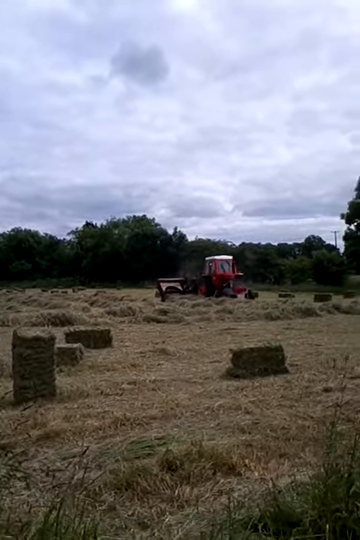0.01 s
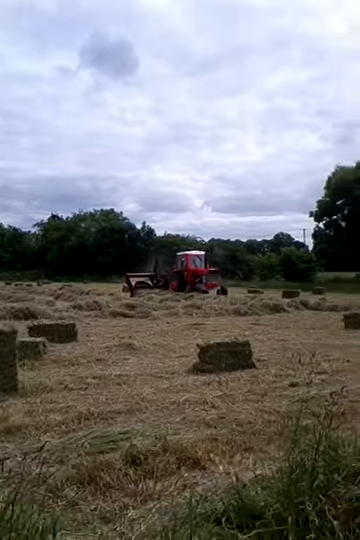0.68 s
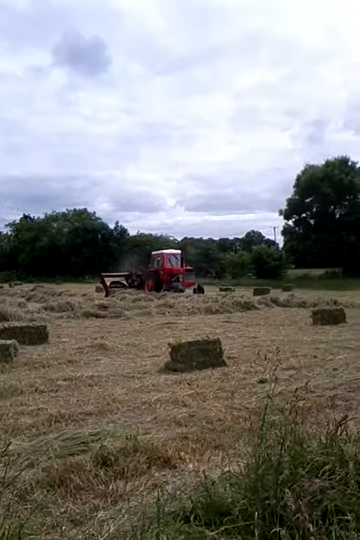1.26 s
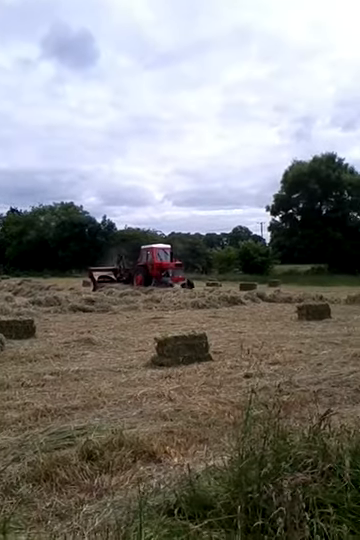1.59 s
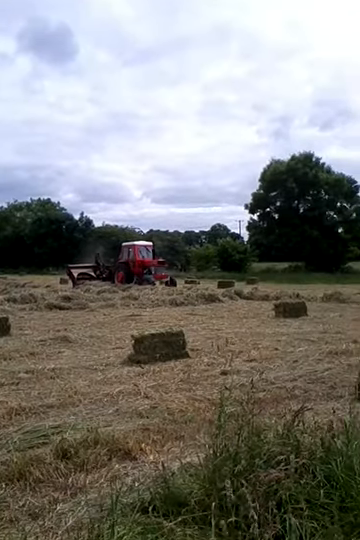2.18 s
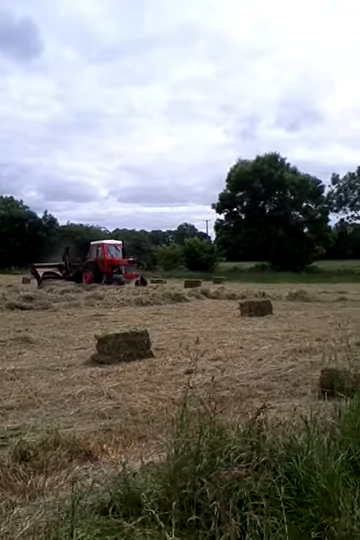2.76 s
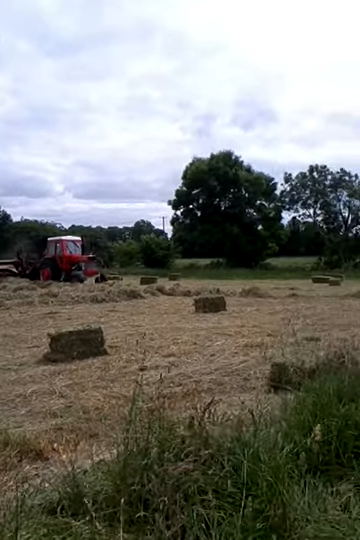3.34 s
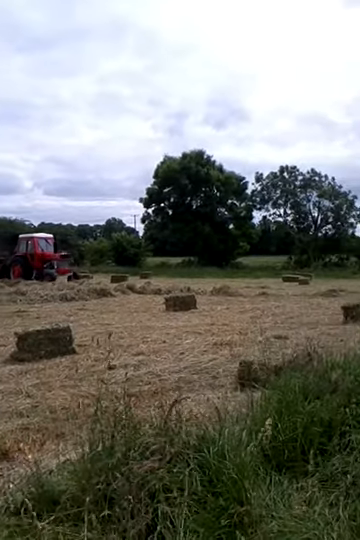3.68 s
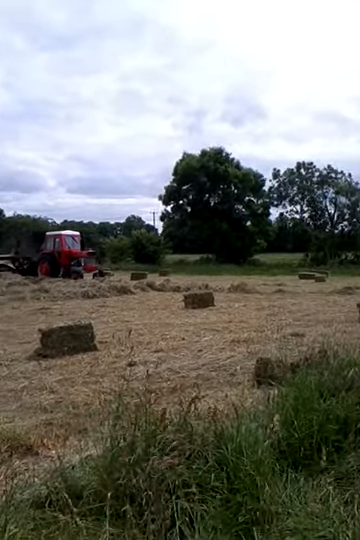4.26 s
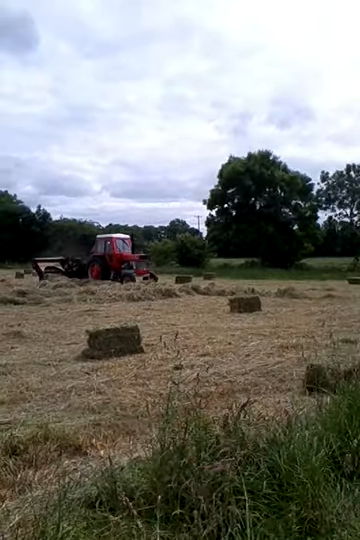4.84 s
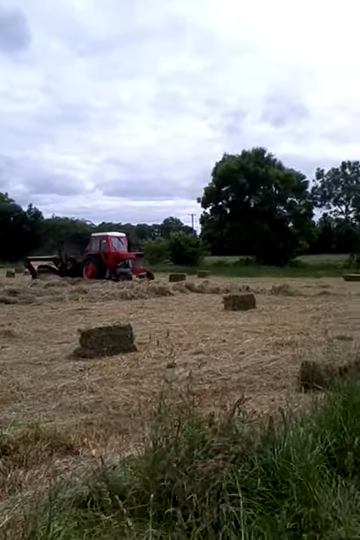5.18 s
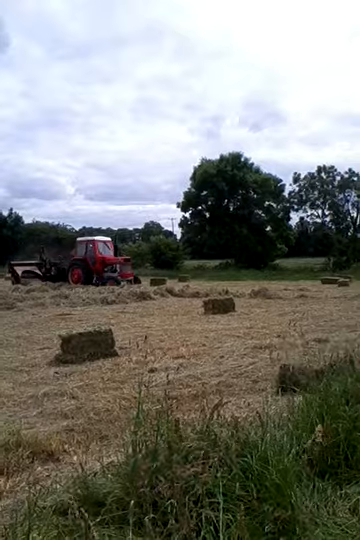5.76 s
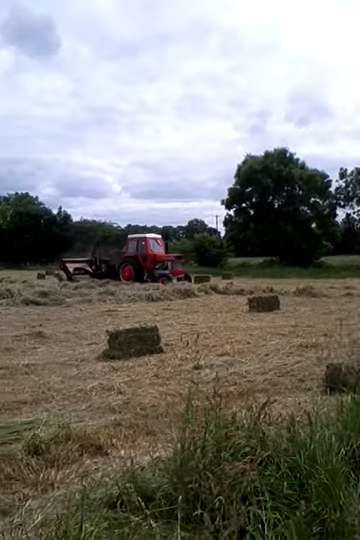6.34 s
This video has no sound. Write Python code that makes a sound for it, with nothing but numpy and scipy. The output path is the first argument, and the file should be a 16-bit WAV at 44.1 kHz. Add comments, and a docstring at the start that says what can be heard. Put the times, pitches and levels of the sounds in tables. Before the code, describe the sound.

A diesel tractor tows a baler some way off in an open field, its engine droning and clattering steadily over a faint hiss of hay. The baler chafes about once a second. After a second or so, sharp knocks and dull bumps sound right on the hand-held microphone, much louder than the machine, followed by finger rubbing and small squeaks. The tractor then carries on with occasional light metallic clinks and clacks.

```python
"""A hayfield, where a three-cylinder diesel tractor tows a baler some way off. Periodic firing drives
the exhaust drone and the engine's clatter, in which a blurred tone wavers; the pick-up rushes through
the hay, the plunger chafes about once a second, and metal parts clink and clack. Close by, as the grip
shifts on a hand-held casing, sharp knocks and dull bumps excite its hollow modes, and the fingers rub
lightly over it."""
import sys
import numpy as np
from scipy import signal
from scipy.fft import rfft, irfft
from scipy.io import wavfile
from scipy.ndimage import uniform_filter1d, map_coordinates

SR = 44100
rng = np.random.default_rng(int(sys.argv[2]) if len(sys.argv) > 2 else 0)


def unload_wav(signal):
    """Save mono or channel-first audio to the path in sys.argv[1] as 16-bit WAV at rate SR, clipped to [-1, 1]."""
    wavfile.write(
        sys.argv[1],
        SR,
        np.round(np.clip(np.atleast_2d(signal).T, -1, 1) * 32767).astype(np.int16),
    )


N = 287532
T = np.arange(N) / SR

FIRING_HZ = 37.45
FIRING_CYCLES = FIRING_HZ * T + .32
FIRING_BEAT = np.cos(2 * np.pi * FIRING_CYCLES)
SURGE_HALF_S = 0.11

# The distant machines. Each row: time in seconds, then drone, clatter, hay and tone in relative dB.
MACHINE_LEVELS = [(0, -57.5, -50.5, -65, -64), (1.2, -55.5, -50, -62.5, -63),
                  (2.8, -52.5, -47, -58.5, -56.5), (3.9, -55.5, -50.5, -61, -58.5),
                  (5.7, -57, -50.5, -61, -60), (6.5, -57.5, -49.5, -61.5, -62)]
# Exhaust harmonics. Each row: multiple of the firing rate, level in dB.
EXHAUST_HARMONICS = [(3, -9.5), (4, -1.5), (5, -11.5), (6, -20), (7, -14.5), (8, -29), (10, -9.5),
                     (13, -15), (16, -15.5)]
# Heavier exhaust chugs. Each row: crest in seconds, peak in dB, pitch in Hz, half length in seconds.
EXHAUST_CHUGS = [(0.205, -45.5, 172.6, 0.075), (.568, -38, 176, 0.012), (.622, -41.5, 179, 0.012),
                 (.88, -46, 172, .04), (1.0, -39, 181, 0.011), (1.135, -39.5, 180, 0.011),
                 (2.87, -40.5, 170, 0.044), (3.145, -39.5, 146, .03), (3.286, -33.5, 186, 0.01),
                 (3.316, -35, 180, 0.0057), (3.535, -37, 193, 0.013), (3.79, -41, 143, 0.016),
                 (3.965, -37.5, 173, 0.014), (4.145, -43.5, 150, 0.023), (4.295, -39, 185, 0.017),
                 (4.35, -43, 143, 0.017), (4.515, -40, 195, 0.0087), (4.955, -39, 182, 0.012),
                 (5.03, -42.5, 148, 0.018), (5.185, -40, 164, 0.0083), (5.455, -42.5, 192, 0.018),
                 (6.329, -37, 177, 0.0062), (6.432, -42, 184, 0.0081)]
# Spectral envelopes. Each row: frequency in Hz, spectral density in relative dB.
DRONE_SPECTRUM = [(25, -20), (80, -23.5), (98, -18), (115, -3), (160, -3.5), (200, 0), (250, -3),
                  (320, -9.5), (450, -24.5), (800, -36.5)]
CLATTER_SPECTRUM = [(150, -1.5), (400, -0.5), (700, -0.5), (860, 1.5), (1100, 1.5), (1220, -1.5),
                    (1350, 4.5), (1620, -2), (1870, -6), (2430, -4), (2620, -7), (3000, -6), (3500, -17),
                    (4400, -17.5), (6500, -30)]
HAY_SPECTRUM = [(1500, -14), (3400, 0), (3780, 4), (4000, -3.5), (4200, 3), (4400, -6.5), (4700, 3),
                (5080, 5), (5400, 1), (5750, 0), (6100, -2), (6600, -3.5), (7100, -10), (7600, -5.5)]
SCRAPE_SPECTRUM = [(70, -25.5), (120, 8.5), (190, 7.5), (330, 4), (560, -3), (830, 3.5), (1050, -7),
                   (1350, 5), (1800, -8), (2200, -20.5), (2650, -1), (3500, -16.5), (5000, -12.5)]
CRACKLE_SPECTRUM = [(2000, -3), (3500, 4), (5000, 2), (6000, -3.5), (6700, -3), (7500, -3.5)]
HOLLOW_SPECTRUM = [(60, -31.5), (90, -17), (135, 0), (190, -2.5), (250, -1.5), (380, -19)]
CRACK_SPECTRUM = [(70, -36), (120, 10.5), (330, -2), (600, -1.5), (950, -12), (1300, -1), (1520, -11),
                  (1800, -1), (2280, -7), (2650, -3), (2950, -6), (3400, -4), (4150, -8.5), (4400, -6.5),
                  (5000, -7.5), (5500, -9.5), (6800, -15.5), (7600, -21)]
CLACK_SPECTRUM = [(700, -20), (1500, 12), (2400, -2), (3300, 4.5), (4200, 0), (6000, -15)]
# Notches in the distant sound. Each row: centre in Hz, width in Hz, depth from 0 to 1.
NOTCHES = [(960, 160, 0.55), (2100, 1000, 0.12), (3990, 620, 0.33)]
# Clinks and squeaks. Each row: start in seconds, level in dB, pitch in Hz, length in seconds,
# glide as a share of the pitch per length.
CLINK_EVENTS = [(0.227, -49, 1590, 0.02, -0.01), (.3, -53, 3110, 0.021, -.03),
                (0.493, -52, 2540, .04, -0.025), (0.765, -52.5, 3040, 0.085, .02),
                (1.338, -28.5, 1277, 0.021, 0.017), (1.342, -32.5, 1705, 0.013, -0.023),
                (1.399, -36, 1317, 0.012, -0.0032), (1.454, -36, 1237, 0.012, 0),
                (1.447, -46, 5480, 0.039, -0.013), (1.45, -44, 2790, 0.022, 0),
                (1.476, -39.5, 2630, 0.05, -0.0018), (1.53, -33, 1812, 0.02, -0.047),
                (1.637, -26, 2540, 0.0098, -0.025), (1.697, -49, 2604, .05, .02),
                (1.748, -45, 5130, .022, .02), (1.777, -47, 5280, 0.12, -0.031),
                (1.817, -40.5, 2980, 0.027, -0.0034), (1.828, -49.5, 6460, 0.059, 0.016),
                (2.091, -51, 6360, 0.035, 0), (2.177, -42, 2700, 0.025, 0),
                (2.317, -40.5, 3950, 0.024, -0.0023), (2.33, -40, 3056, 0.039, 0.029),
                (2.417, -34.5, 1347, 0.013, 0), (2.435, -34, 1340, 0.03, -0.034),
                (2.436, -42, 830, 0.04, 0.0067), (2.445, -53, 6100, 0.022, 0),
                (2.482, -50, 6730, 0.022, .02), (2.492, -45, 4060, 0.024, 0),
                (2.625, -46, 1876, 0.04, 0.0022), (2.668, -45.5, 5020, 0.026, -0.0091),
                (4.361, -52, 1298, 0.066, 0), (4.473, -48, 1336, 0.041, -0.018),
                (5.418, -44, 1290, 0.023, 0), (5.501, -54, 5540, 0.044, 0.0025),
                (6.253, -44.5, 1570, 0.02, -0.028), (6.504, -39, 1390, 0.021, 0)]
# Plunger strokes. Each row: crest in seconds, surge in dB, chafing level in dB, chafing pitch in Hz.
PLUNGER_STROKES = [(.385, 1.5, -47.5, 1300), (1.42, -2, -45.5, 1350), (2.455, 1.5, -48, 1300),
                   (3.47, 0.5, -64, 1450), (4.42, 1, -54.5, 1366), (5.46, 2.5, -62, 1340)]
# Slow drag of the fingers. Each row: time in seconds, level in dB.
DRAG_LEVELS = [(1.23, -57), (1.26, -39), (1.55, -44.5), (1.7, -43.5), (1.8, -45.5), (2.22, -51),
               (2.275, -37), (2.4, -47.5), (2.85, -49), (3.05, -58)]
# Quick finger slides. Each row: crest in seconds, crackle in relative dB, half length in seconds.
FINGER_SLIDES = [(1.43, -43.5, 0.016), (1.685, -51, 0.017), (1.857, -52, 0.15), (2.098, -43.5, 0.013),
                 (2.263, -48, 0.023), (2.35, -46, 0.027), (2.525, -48.5, 0.061), (2.682, -51.5, 0.11),
                 (2.831, -45.5, 0.032), (2.895, -49, 0.054), (3.08, -54, 0.09)]
# Dull bumps. Each row: crest in seconds, peak in dB, pitch in Hz, half length in seconds.
CASING_BUMPS = [(1.248, -28, 170, 0.011), (1.28, -9, 187, 0.008), (1.311, -21, 190.6, 0.032),
                (1.395, -26.5, 164.8, 0.03), (1.465, -32.5, 187, 0.021), (1.64, -16, 195, 0.0056),
                (1.679, -21, 187.5, 0.026), (2.205, -34.5, 166, 0.015), (2.256, -12, 180.5, 0.0065),
                (2.293, -24, 168, 0.01), (2.322, -27.5, 179, 0.015)]
# Normal modes of the casing. Each row: frequency in Hz, level in dB, time to fall 60 dB in seconds.
CASING_MODES = [(582, -3, 0.17), (608, -6.5, 0.18), (632, -5, 0.026), (1350, -13.5, 0.16), (1782, -4, 0.11),
                (1834, 3.5, 0.037), (1956, -12, 0.077), (2552, -13.5, 0.081), (2790, -5.5, 0.038),
                (3200, -6, 0.049), (3460, -26, .08), (3770, -28, 0.088), (4180, -29, 0.24),
                (5020, -20, 0.05), (5850, -14.5, 0.062), (6870, -17, 0.032)]
# Sharp knocks. Each row: start in seconds, ring in dB, extra gain below 1 kHz in dB, pitch ratio,
# crack in dB, rattle in dB, rattle length in seconds.
CASING_KNOCKS = [(1.2671, -12, 3, 0.99, -19.5, -22.5, 0.046), (1.279, -32, -8, 1.04, -31, -27, 0.035),
                 (1.309, -38, -1, 1, -28, -29, 0.041), (1.5306, -22, -22, 0.91, -33, -40.5, 0.055),
                 (1.6173, -17.5, -13.5, .97, -24.5, -32, 0.032)]
# Clacks of the baler's linkage. Each row: start in seconds, level in dB.
LINKAGE_CLACKS = [(3.373, -47), (3.825, -43), (5.041, -45.5), (5.95, -48), (6.096, -45.5), (6.256, -47),
                  (6.438, -43)]


def undb(db):
    """Amplitude grows tenfold with every 20 dB."""
    return 10 ** (np.asarray(db) / 20)


def unit(x):
    """Normalisation to rms 1."""
    return x / np.sqrt(np.mean(x ** 2))


def curve(rows, column):
    """Linear interpolation of one column over time."""
    rows = np.array(rows)
    return np.interp(T, rows[:, 0], rows[:, column])


def colour(x, points):
    """Spectral shaping by (Hz, dB) points, rolling off beyond both ends; rms 1."""
    hz, db = np.transpose(points)
    f = np.maximum(np.fft.rfftfreq(len(x), 1 / SR), 1)
    skirts = np.minimum(1, np.minimum(f / hz[0], hz[-1] / f)) ** 2
    gain = skirts * undb(np.interp(np.log(f), np.log(hz), db))
    return unit(irfft(rfft(x) * gain, len(x)))


def narrow(x, hz):
    """A narrow resonance turns noise into a rough tone; rms 1."""
    peak = [(hz / 1.25, -35), (hz / 1.05, -6), (hz, 0), (hz * 1.05, -6), (hz * 1.25, -35), (hz * 2, -70)]
    return colour(x, peak)


def low_pass(x, hz):
    """An elliptic filter cuts steeply above its edge."""
    return signal.sosfilt(signal.ellip(8, .2, 70, hz, fs=SR, output="sos"), x)


def walk(rate):
    """Slow random modulation: levels held 1 / rate seconds and smoothed twice; rms 1."""
    hold = int(SR / rate)
    steps = np.repeat(rng.standard_normal(N // hold + 1), hold)
    return unit(uniform_filter1d(uniform_filter1d(steps, hold), hold)[:N])


def grains(spread_db):
    """Rapid random modulation breaks noise into tiny uneven clicks."""
    return rng.standard_normal(N) * undb(spread_db * np.repeat(rng.standard_normal(N // 32 + 1), 32)[:N])


def swell(at, half_s):
    """A Gaussian envelope with peak 1."""
    return np.exp(-np.minimum(((T - at) / half_s) ** 2, 50))


def push(at, hz, half_s):
    """A wave packet: a tone that swells and fades."""
    return swell(at, half_s) * np.sin(2 * np.pi * hz * (T - at))


def add(out, at, sound):
    """Superposition of a sound from a given time."""
    i = int(at * SR)
    out[i:i + len(sound)] += sound[:N - i]


def pings(count, lo_hz, hi_hz, ring_s, span=(0, T[-1])):
    """Tiny contacts each excite a damped vibration at a random pitch; rms 1 over the span."""
    out, t = np.zeros(N), T[:SR // 8]
    start, end = span
    for when, pitch, size, hold in rng.random((count, 4)):
        ring = np.sin(2 * np.pi * (lo_hz + (hi_hz - lo_hz) * pitch) * t)
        envelope = (1 - np.exp(-t / 0.0007)) * np.exp(-t / (ring_s * (0.35 + hold)))
        add(out, start + when * (end - start), undb(31 * size) * ring * envelope)
    return unit(out) * np.sqrt((end - start) / T[-1])


def surge_db():
    """Amplitude modulation: each plunger stroke briefly shifts the level of the clatter and pick-up."""
    return sum(db * swell(at, SURGE_HALF_S) for at, db, _, _ in PLUNGER_STROKES)


def exhaust():
    """Periodic puffs, one per firing, form a harmonic series over a pulsing rumble and heavier chugs."""
    harmonics = np.zeros(N)
    for k, db in EXHAUST_HARMONICS:
        # moving air makes each harmonic waver in level and phase
        gain = undb(db + 1.2 * walk(4.1))
        cycles = k * (FIRING_CYCLES + 0.019 * walk(4)) + rng.random()
        harmonics += gain * np.sin(2 * np.pi * cycles)
    rumble = colour(rng.standard_normal(N), DRONE_SPECTRUM) * undb(1.3 * walk(30) - FIRING_BEAT)
    drone = undb(1) * unit(harmonics) + undb(5) * rumble
    chugs = sum(undb(db) * push(at, hz, half_s) for at, db, hz, half_s in EXHAUST_CHUGS)
    return drone * undb(curve(MACHINE_LEVELS, column=1)) + chugs


def diesel_clatter():
    """Impulsive excitation: every firing rattles the block, so its noise pulses at the firing rate."""
    rattle = colour(grains(spread_db=0.5), CLATTER_SPECTRUM) * undb(1.43 * FIRING_BEAT + 0.55 * walk(30))
    return rattle * undb(curve(MACHINE_LEVELS, column=2) + surge_db() + 0.5)


def pick_up():
    """Impact and friction: the baler's tines jingle as they sweep through hissing hay."""
    tines = pings(count=1500, lo_hz=734, hi_hz=3329, ring_s=.012)
    tines *= undb(curve(MACHINE_LEVELS, column=2) - 10.5)
    hay = colour(grains(spread_db=1.5), HAY_SPECTRUM) * undb(1.4 * FIRING_BEAT + 1.14 * walk(30))
    hay *= undb(curve(MACHINE_LEVELS, column=3) + 4)
    return (tines + hay) * undb(surge_db())


def clatter_resonance(centre_hz=855, wander_share=.025):
    """Narrow-band noise: a blurred, wavering tone that swells within the distant machine noise."""
    lag = np.cumsum(wander_share * walk(5))
    steady = narrow(rng.standard_normal(N), centre_hz)
    tone = map_coordinates(steady, [np.arange(N) + lag], order=1, mode="mirror")
    return tone * undb(curve(MACHINE_LEVELS, column=4) + 2.4 * walk(7))


def hollow(x, fill_span_s=(1.5, 3)):
    """Spectral notches make the distant sound hollow; they fill in as the grip shifts."""
    f = np.fft.rfftfreq(N, 1 / SR)
    dips = sum(depth * np.exp(-(2 * (f - hz) / width) ** 2) for hz, width, depth in NOTCHES)
    return x - irfft(rfft(x) * dips, N) * np.interp(T, fill_span_s, (1, 0))


def clinks(blur_share=0.027, roughness_per_hz=0.00034):
    """Friction excites chafing parts: a fluttering ring that glides in pitch, over a broad scrape."""
    out, t = np.zeros(N), T[:SR // 4]
    for at, db, hz, length, glide in CLINK_EVENTS:
        chafe, real, imag = rng.standard_normal((3, len(t)))
        blur = signal.butter(2, blur_share * hz, fs=SR, output="sos")
        flutter = (unit(signal.sosfilt(blur, real)) + 1j * unit(signal.sosfilt(blur, imag))) / np.sqrt(2)
        roughness = roughness_per_hz * hz
        waver = (1 + roughness * flutter) / np.hypot(1, roughness)
        ring = 1.42 * np.imag(waver * np.exp(2j * np.pi * hz * t * (1 + glide * t / length / 2)))
        scrape = undb(-7) * colour(chafe, SCRAPE_SPECTRUM)
        envelope = (1 - np.exp(-t / 0.0015)) * np.exp(-(t / length) ** 2)
        add(out, at, undb(db) * envelope * (ring + scrape))
    return out


def plunger(chafe_half_s=0.074, jingle_db=-55):
    """Sliding friction makes the plunger squeal in its channel; each stroke shakes loose metal."""
    chafe = rng.standard_normal(N)
    upper_ring = undb(-8.5) * narrow(chafe, hz=2500)
    squeal = sum(undb(db) * swell(at, chafe_half_s) * (narrow(chafe, hz) + upper_ring)
                 for at, _, db, hz in PLUNGER_STROKES)
    squeal *= undb(2 * walk(25))
    shake = sum(undb(jingle_db + db) * swell(at, SURGE_HALF_S) for at, db, _, _ in PLUNGER_STROKES)
    return squeal + shake * pings(count=1100, lo_hz=896, hi_hz=2540, ring_s=0.0077)


def rubbing(creep_db=-21):
    """Stick-slip friction of skin on the casing: a grainy scrape, and tiny slips that squeak."""
    start, end = DRAG_LEVELS[0][0], DRAG_LEVELS[-1][0]
    squeaks = pings(count=700, lo_hz=1122, hi_hz=3442, ring_s=0.0092, span=(start, end))
    slips = pings(count=1800, lo_hz=4290, hi_hz=7800, ring_s=0.0058, span=(start, end))
    scrape = colour(grains(spread_db=5), SCRAPE_SPECTRUM) * undb(0.5 + 2 * walk(50.13))
    crackle = undb(-7) * slips + undb(-7.5) * colour(grains(spread_db=3.5), CRACKLE_SPECTRUM)
    drag = undb(curve(DRAG_LEVELS, column=1)) * (T > start) * (T < end)
    slides = sum(undb(db) * swell(at, half_s) for at, db, half_s in FINGER_SLIDES)
    return (scrape + undb(-8.5) * squeaks) * drag + crackle * (slides + undb(creep_db) * drag)


def bumps(sway_hz=44.8, shudder_hz=194.5, attack_s=0.0038, settle_s=0.063):
    """Soft pushes excite only the lowest resonance, which shudders unevenly until the grip settles."""
    out, t = np.zeros(N), T[:SR // 4]
    settle = (1 - np.exp(-t / attack_s)) * np.exp(-(t / settle_s) ** 2)
    for at, db, hz, half_s in CASING_BUMPS:
        sway = undb(-28.5) * push(at, sway_hz, half_s)  # the whole casing gives a little
        out += undb(db) * (push(at, hz, half_s) + sway)
        shudder = np.sin(2 * np.pi * (shudder_hz * T + 0.29 * walk(170))) * undb(4.1 * walk(118))
        add(out, at, undb(db - 14) * settle * colour(shudder[:len(t)], HOLLOW_SPECTRUM))
    return out


def knocks():
    """A blow excites the casing's normal modes, whose pitch shifts with the grip; a rattle follows."""
    out, t = np.zeros(N), T[:SR // 3]
    for at, ring_db, low_db, ratio, crack_db, rattle_db, rattle_s in CASING_KNOCKS:
        ring = sum(undb(db + low_db * (hz < 1000) - 60 * t / t60) * np.sin(2 * np.pi * hz * ratio * t)
                   for hz, db, t60 in CASING_MODES)
        add(out, at, undb(ring_db) * ring * (1 - np.exp(-t / 0.0031)))
        add(out, at, undb(rattle_db) * chatter(t) * np.exp(-(t / rattle_s) ** 2))
        # the surfaces scrape just before they seat with a crack
        crack = colour(rng.standard_normal(len(t)), CRACK_SPECTRUM) * np.exp(-np.abs(t - .0075) / 0.0044)
        add(out, at - .005, undb(crack_db) * crack)
    return out


def chatter(t, contacts_per_s=1500, t60_s=0.019):
    """Random light impacts each excite their own mix of the pressed casing's damped modes; rms 1."""
    n = len(t)
    contacts = rng.random(n) < contacts_per_s / SR
    fade = undb(-60 * t / t60_s)
    rings = sum(signal.fftconvolve(contacts * rng.standard_normal(n), fade * np.sin(2 * np.pi * hz * t))
                for hz, _, _ in CASING_MODES)
    ticks = undb(-14) * unit(contacts * rng.standard_normal(n))
    return colour(unit(rings[:n]) + ticks, CRACK_SPECTRUM)


def clacks(t60_s=0.13):
    """Backlash: the baler's linkage takes up its slack in dry, quickly damped impacts."""
    out, t = np.zeros(N), T[:SR // 6]
    for at, db in LINKAGE_CLACKS:
        add(out, at, undb(db - 60 * t / t60_s) * colour(rng.standard_normal(len(t)), CLACK_SPECTRUM))
    return out


def scene():
    """In a free field the sources add with no reflections from walls."""
    distant = hollow(exhaust() + diesel_clatter() + pick_up() + clatter_resonance())
    return (distant + plunger() + clacks() + knocks() + bumps() + rubbing() + clinks())[None]


def record(dry, band_hz=7150, sampling_hz=16000, top_hz=9300):
    """Saturation rounds the peaks; a low sampling rate mirrors faint treble above the passband."""
    sound = np.tanh(dry)
    mirror = undb(-14) * low_pass(sound, hz=7600) * np.cos(2 * np.pi * sampling_hz * T)
    return low_pass(low_pass(sound, band_hz) + mirror, top_hz)


dry = scene()
out = record(dry)
unload_wav(out)
```